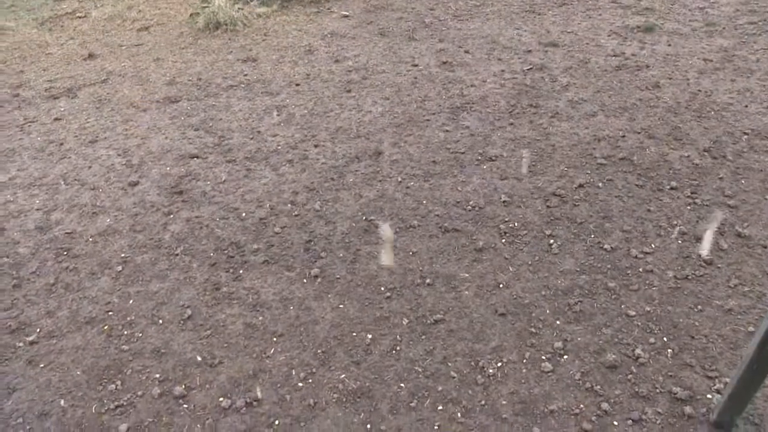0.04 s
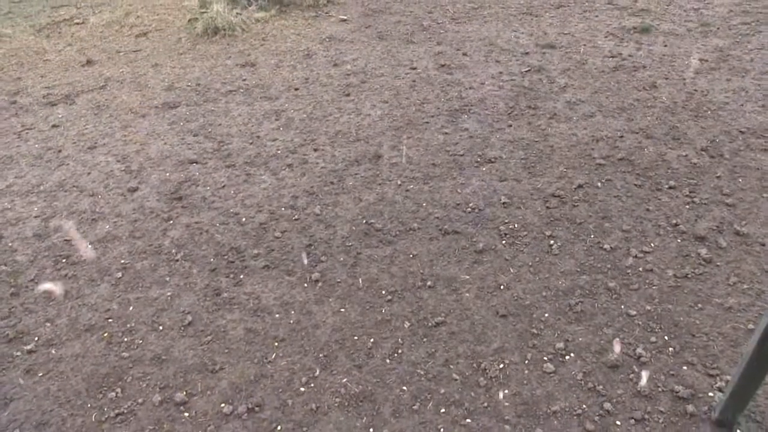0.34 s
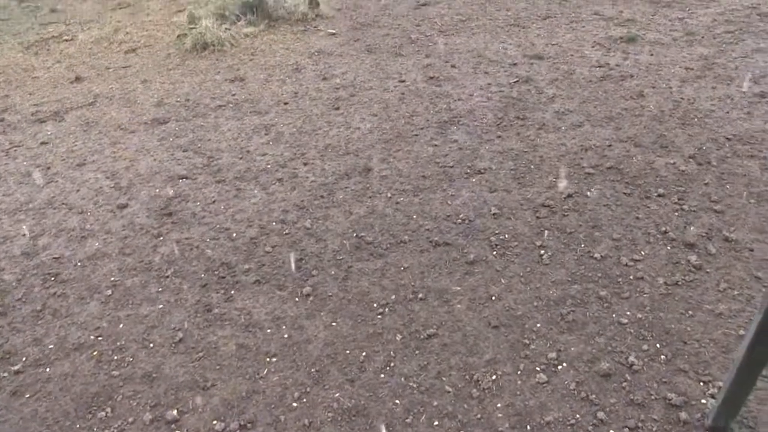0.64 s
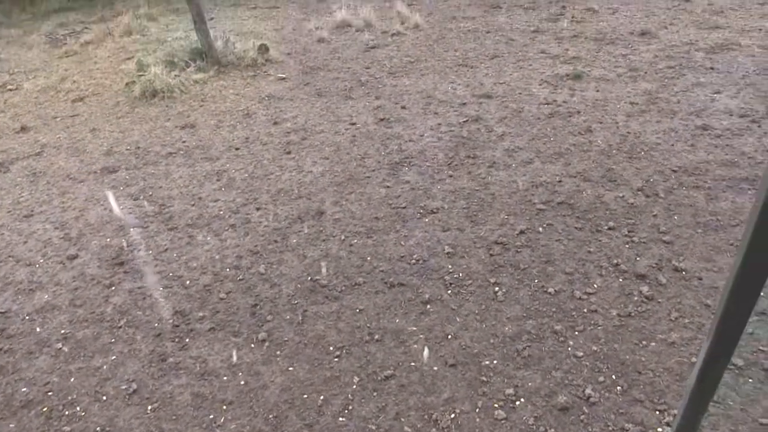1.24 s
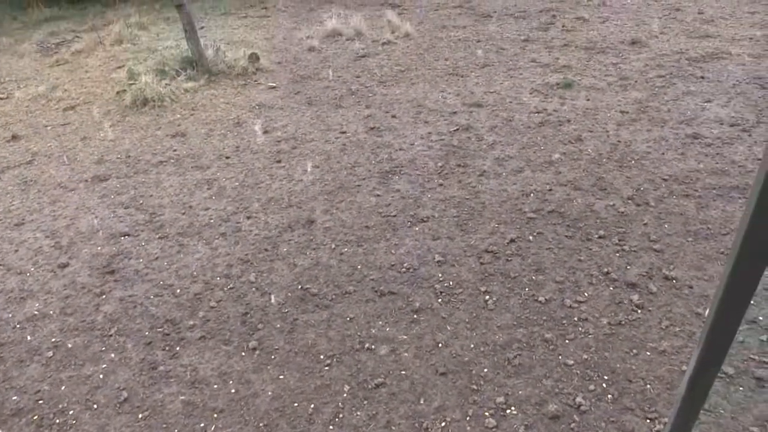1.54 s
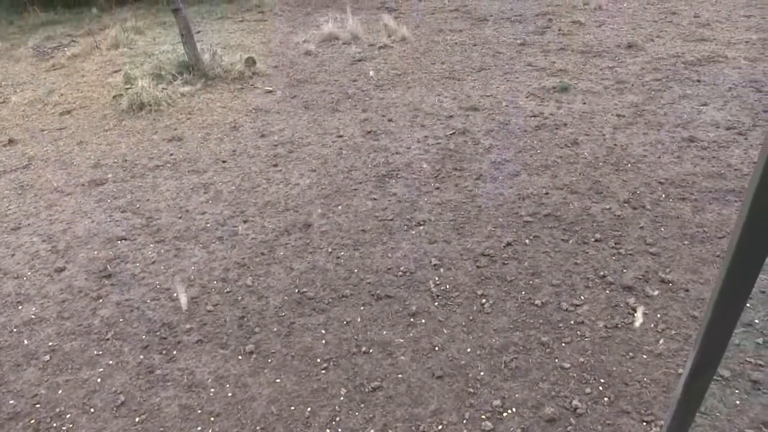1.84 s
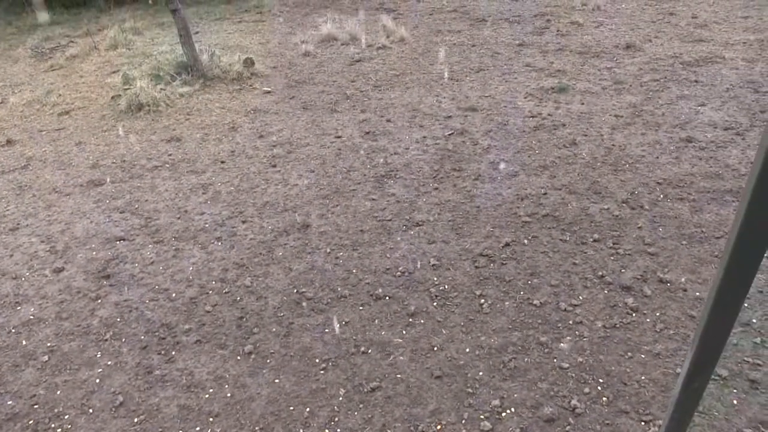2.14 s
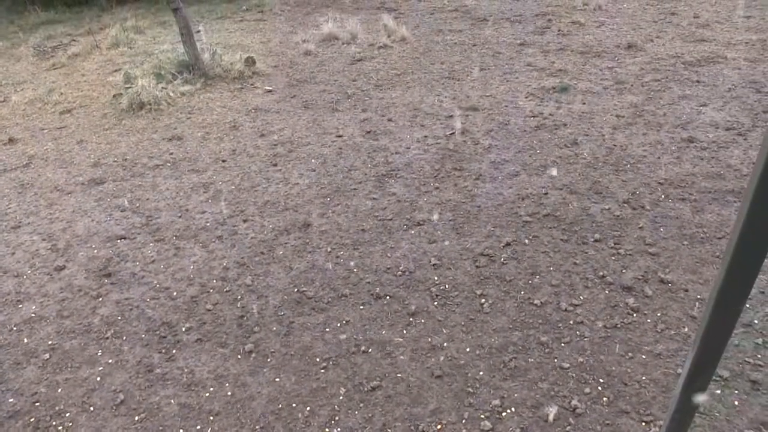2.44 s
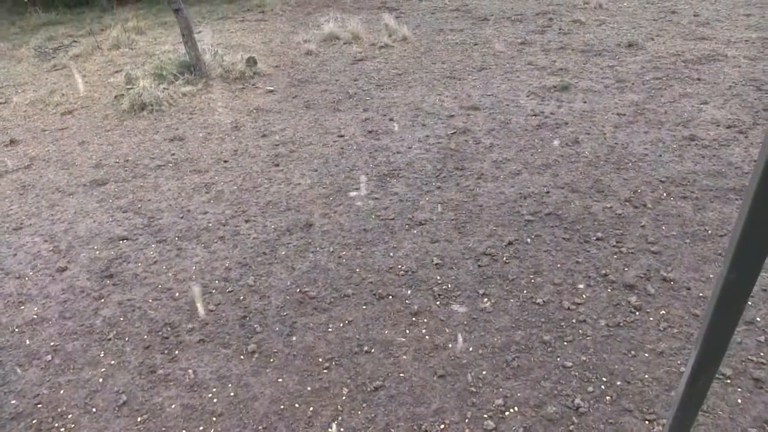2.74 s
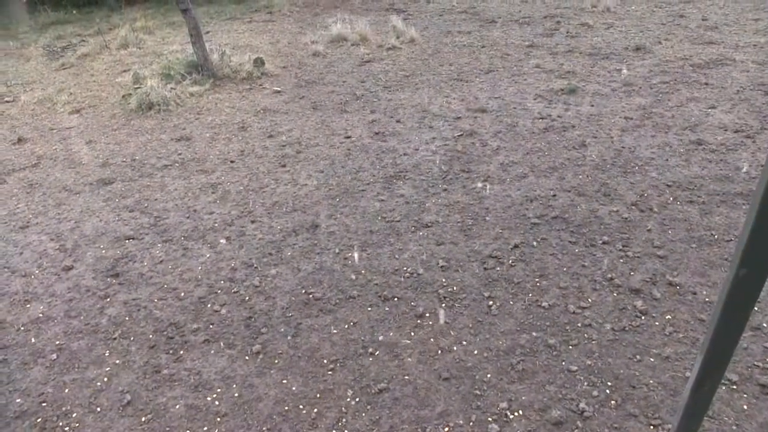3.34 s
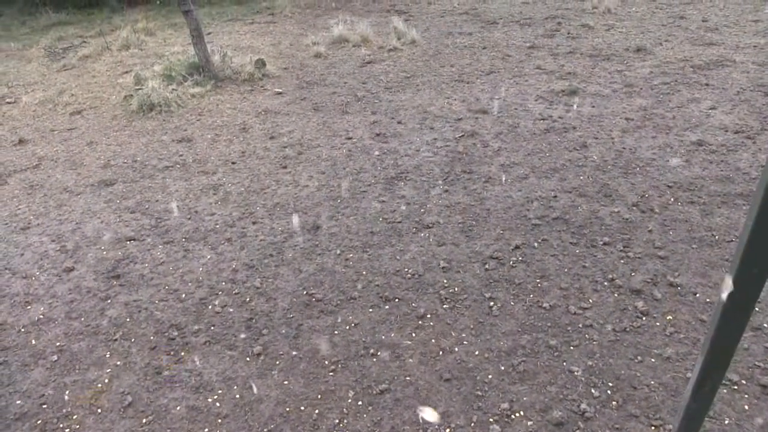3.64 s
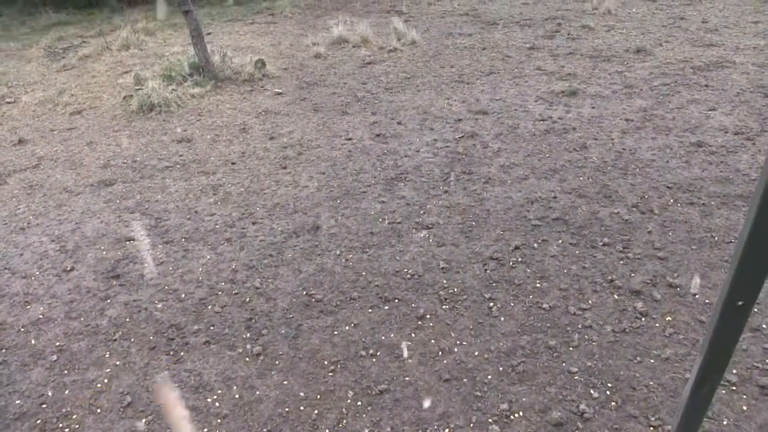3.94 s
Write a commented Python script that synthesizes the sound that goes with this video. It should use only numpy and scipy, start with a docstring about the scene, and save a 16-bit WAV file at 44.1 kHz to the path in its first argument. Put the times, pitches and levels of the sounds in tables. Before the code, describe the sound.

A bright metallic rattle of feed hitting a spinning feeder plate outdoors, gradually thinning.

```python
"""Spinning feeder outdoors

A stream of kernels rattles on an automatic feeder's metal spinner plate and housing, each impact
a short clack that sets the metal ringing. The flow thins about halfway. The same impacts make the
hollow hopper drone under the rattle. Thrown kernels patter on bare ground, a little air rumbles
at the microphone, and one dry knock sounds near the end."""
import sys
import numpy as np
from scipy import signal
from scipy.fft import rfft, irfft
from scipy.io import wavfile
from scipy.ndimage import uniform_filter1d

SR = 44100
rng = np.random.default_rng(int(sys.argv[2]) if len(sys.argv) > 2 else 0)


def put_to_file(sound):
    """Save the sound as 16-bit audio at rate SR, in the file named by the first command-line argument."""
    columns = np.atleast_2d(sound).T  # one column per channel
    safe = np.clip(columns, -1, 1)
    whole_steps = np.round(safe * 32767)
    wavfile.write(sys.argv[1], SR, whole_steps.astype(np.int16))


N = 4 * SR
TIME, HZ = np.arange(N) / SR, np.fft.rfftfreq(N, 1 / SR)


def amp(db):
    """Decibels to gain."""
    return 10 ** (np.asarray(db) / 20)


def unit_rms(x):
    """Scales to rms 1."""
    return x / np.sqrt(np.mean(x ** 2) + 1e-20)


def curve(rows):
    """A time table's value at every sample."""
    return np.interp(TIME, *np.transpose(rows))


def spectrum_curve(rows):
    """A spectrum table's value at every frequency."""
    hz, value = np.transpose(rows)
    return np.interp(np.log(HZ + 1), np.log(hz + 1), value)


def add(mix, start_s, sound):
    """Drops a sound into the mix."""
    part = mix[max(round(start_s * SR), 0):][:len(sound)]
    part += sound[:len(part)]


def colour(x, eq):
    """Minimum-phase EQ of unit energy: the table sets only the tone."""
    cepstrum = irfft(np.log(unit_rms(amp(spectrum_curve(eq)))), N)
    cepstrum[1:N // 2] *= 2
    cepstrum[N // 2 + 1:] = 0
    return irfft(rfft(x) * np.exp(rfft(cepstrum)), N)


def clicks(per_s, spread_db):
    """Random impacts of uneven size, rms 1."""
    size = amp(spread_db * np.minimum(rng.exponential(1, N), 3.5))
    return unit_rms(size * (rng.random(N) < per_s / SR))


def bursts(hits, t60_s, spots=8):
    """Each impact lands on one of several spots, each with its own dying noise burst; two versions."""
    t = TIME[:2048]
    spot = rng.integers(0, spots, N)
    dying_noise = rng.standard_normal((spots, 2, len(t))) * 1000 ** (-t / t60_s)
    spectra = rfft(dying_noise, 2 * len(t))
    average = np.sqrt(np.mean(abs(spectra) ** 2, axis=0))
    shapes = irfft(spectra / average)[..., :len(t)]  # together the spots sound white
    return sum(signal.oaconvolve((hits * (spot == k))[None], shapes[k], axes=1)[:, :N]
               for k in range(spots))


def ring(hits, modes):
    """Each impact pushes every mode by a chance amount, set by where it lands; two versions."""
    ringing, chance = np.zeros((2, N)), rng.standard_normal((2, N))
    for hz, db, t60_s in modes:
        radius = 1000 ** (-1 / (t60_s * SR))
        gain = amp(db) * np.sqrt((1 - radius ** 2) / 2)
        feedback = [1, -2 * radius * np.cos(2 * np.pi * hz / SR), radius ** 2]
        push = hits * np.roll(chance, rng.integers(N), 1)
        ringing += signal.lfilter([gain, 0, -gain], feedback, push)
    return ringing


# Fader ride of the rumble: time_s, relative_db
AIR_LEVEL = [(0.0, -74), (0.47, -71), (0.56, -88), (0.83, -62), (0.9, -78), (1.53, -58), (2.38, -67),
             (2.54, -98), (2.73, -71), (2.77, -90), (3.6, -83), (4.0, -60.5)]
# Dark tone of the air: freq_hz, relative_db
AIR_EQ = [(15, -10), (35, -12), (70, -5), (120, 1), (250, -1.5), (1000, -52)]


def air_rumble(trim_db=6):
    """Air at the microphone makes a faint, uneven low rumble."""
    return colour(rng.standard_normal((2, N)), AIR_EQ) * amp(trim_db + curve(AIR_LEVEL))


# Kernels landing close by: start_s, relative_db
CLOSE_LANDINGS = [(.159, -23), (.461, -27), (.817, -21), (1.195, -23), (1.241, -19), (1.279, -16),
                  (1.567, -22), (1.629, -22), (1.738, -22), (2.226, -28), (2.411, -24), (2.979, -21)]
# Dull tone of a landing on soil: freq_hz, relative_db
SOIL_EQ = [(50, -29), (150, -13), (450, 1), (1200, 3), (2000, -9), (5000, -7), (16000, -48)]


def ground_patter(flow_db, patter_trim_db=-31, close_trim_db=10):
    """Thrown kernels patter on dry soil, following the flow; a few land close by."""
    hits = clicks(per_s=90, spread_db=5.5) * amp(patter_trim_db + flow_db)
    for start_s, db in CLOSE_LANDINGS:
        add(hits, start_s, amp([db + close_trim_db]))
    return colour(bursts(hits, t60_s=0.055), SOIL_EQ)


# Midrange tone of the knock: freq_hz, relative_db
KNOCK_EQ = [(60, -35), (500, -17), (850, -10), (1250, 2.5), (1800, -2), (2200, -9), (3000, 0), (3800, -20),
            (6000, -40), (16000, -60)]


def knock(start_s=3.8071, peak_db=-9.5):
    """One dead tap, a cycle or two long."""
    tap = colour(np.arange(N) == round(start_s * SR), KNOCK_EQ)
    return amp(peak_db) * tap / abs(tap).max()


# Hollow resonances of the hopper: pitch_hz, gain_db, t60_s
HOPPER_MODES = [(214.5, -33.5, 0.19), (213, -47, 0.27), (391, -43, 0.2), (612.6, -36, 0.27),
                (991, -45, 0.049)]


def hopper_drone(hits):
    """The kernels' impacts keep the hopper's low modes sounding."""
    return ring(hits, HOPPER_MODES)


# Flow of feed over the spinner: time_s, level_db
FEED_FLOW = [(0.0, -15), (0.2, -16.5), (0.21, -12.5), (0.37, -17.5), (0.42, -13.5), (0.43, -17),
             (0.58, -14), (0.59, -16), (0.88, -16), (0.9, -11), (0.93, -19), (1.02, -12.5), (1.11, -15),
             (1.15, -18.5), (1.17, -14.5), (1.31, -12.5), (1.37, -18), (1.48, -14.5), (1.5, -16),
             (1.54, -12), (1.56, -19), (1.61, -14.5), (1.85, -16), (1.94, -21.5), (1.96, -24.5),
             (1.97, -20.5), (2.52, -21), (2.53, -18.5), (2.61, -23.5), (2.65, -19), (2.91, -22),
             (3.01, -19.5), (3.1, -24.5), (3.13, -20), (3.25, -21.5), (3.3, -17.5), (3.36, -23),
             (3.44, -22.5), (3.58, -23.5), (3.61, -22.5), (3.73, -25), (3.74, -21), (3.84, -26),
             (4.0, -24.5)]
# Hard strikes on the plate: start_s, relative_db
HARD_STRIKES = [(0.0925, 8), (0.2048, -20), (0.382, 0), (0.4702, -12), (0.569, 2.5), (0.634, -20),
                (0.8964, -2), (0.996, 2), (1.1607, 4.5), (1.2185, 0), (1.296, -13), (1.4111, 4.5),
                (1.468, -4), (1.533, 1), (1.6017, 4.5), (1.6515, -5), (1.7347, 5), (1.9719, -3),
                (2.0575, -2), (2.253, 2), (2.445, 0), (2.5239, -9), (2.986, -9), (3.1231, -1),
                (3.2713, -10), (3.4282, -2), (3.6095, -2), (3.6684, -2)]


def kernel_stream(clump_hz=70, clump_db=1.33, strike_trim_db=6.5, chatter_s=0.004):
    """Kernels reach the spinner in loose clumps; now and then one strikes hard and chatters."""
    slow_band = (HZ > 5) / (1 + (HZ / clump_hz) ** 2)
    clumps = unit_rms(irfft(rfft(rng.standard_normal(N)) * slow_band, N))
    kernels = clicks(per_s=3800, spread_db=2) * amp(clump_db * clumps)
    hits = unit_rms(kernels) * amp(curve(FEED_FLOW))
    for start_s, db in HARD_STRIKES:
        delays_s = chatter_s * np.sort(rng.random(size=4))
        delays_s[0] = 0  # the first contact is on time
        for delay_s in delays_s:
            add(hits, start_s + delay_s, amp([db + strike_trim_db]) / 2)
    return hits


# Depth of the notches between the metal's peaks: time_s, depth_fraction
NOTCH_DEPTH = [(0, 0.4), (3.4, 0.67), (3.8, .65), (4, .7)]


def hollow_out(metal, notches_hz=(6090, 7540, 8420, 9810, 12000), width_hz=190):
    """As the feed runs thin, the ring hollows out between its peaks."""
    notches = sum(np.exp(-((HZ - hz) / width_hz) ** 2) for hz in notches_hz)
    return metal - curve(NOTCH_DEPTH) * irfft(rfft(metal) * notches, N)


# Tilt of the treble over the mids: time_s, tilt_db
TREBLE_TILT = [(0, -0.5), (.37, 3), (.45, 1.5), (.58, 1.5), (.64, -1), (.72, -3), (1.08, 1), (1.14, -0.5),
               (1.2, 0), (1.32, -2), (1.39, -1.5), (1.46, 4), (1.55, -1), (1.7, -1.5), (1.85, 0),
               (2.6, -.5), (3.3, 0.5), (3.65, 0.5), (4, -1)]
# Ride on one narrow band of the ring: time_s, gain_db
BAND_SWELL = [(0, -0.5), (.8, -7), (1.05, 2.5), (1.3, 1.5), (1.5, 0), (1.75, 0.5), (2.2, -0.5), (2.7, 0),
              (3.05, -0.5), (3.5, 1.5), (3.65, 2), (4, -1.5)]


def drift_tone(metal, crossover_hz=6000, swell_hz=4780, width_hz=260):
    """The treble drifts against the mids while one narrow band dips and swells."""
    spectrum = rfft(metal)
    mids = irfft(spectrum / (1 + (HZ / crossover_hz) ** 10), N)
    treble = metal - mids
    band = irfft(spectrum * np.exp(-((HZ - swell_hz) / width_hz) ** 2), N)
    swell = band * (amp(curve(BAND_SWELL)) - 1)
    tilt = amp(curve(TREBLE_TILT) / 2)
    return (mids + swell) / tilt + treble * tilt


def wander(metal, depth_db=1.5, patch_bins=14, patch_frames=5):
    """The spot where the stream lands wanders, so each part of the spectrum waxes and wanes."""
    frames = signal.stft(metal, nperseg=512)[2]
    patches = rng.standard_normal(frames.shape[1:])
    for _ in range(2):
        patches = uniform_filter1d(patches, patch_bins, axis=0)
        patches = uniform_filter1d(patches, patch_frames, axis=1)
    gain = unit_rms(amp(depth_db * unit_rms(patches)))
    return signal.istft(frames * gain, nperseg=512)[1][:, :N]


# Bright tone of a kernel's clack: freq_hz, relative_db
CLACK_EQ = [(40, -69), (100, -39), (170, -45.5), (300, -27), (600, -26), (900, -22.5), (1190, -14.5),
            (1500, -21), (1900, -18.5), (2150, -10.5), (2400, -8), (2630, -2.5), (2900, -12), (3080, -20),
            (3300, -4.5), (3520, 2), (3800, -12), (4450, -10), (4850, -3.5), (5200, -13.5), (5950, -12),
            (6300, -9.5), (6650, -5), (7000, -8.5), (7300, -12.5), (7650, -11.5), (7950, -5), (8450, -5),
            (9000, -3), (9650, -13), (10050, -1.5), (10400, 0), (10900, -14), (11900, -16), (12700, -14),
            (15700, -14.5)]
# Ringing modes of plate and housing: pitch_hz, relative_db, t60_s
METAL_MODES = [(1097, -29.5, .28), (1256, -26, .24), (2050, -31, .12), (2480, -27, .08), (2815, -28, .1),
               (3134, -25.5, .25), (3394, -16.5, .12), (3554, -11.5, .07), (4672, -17, .18),
               (4903, -15.5, .11), (5545, -27, .06), (6126, -25, .15), (6433, -17.5, .13),
               (6510, -22.5, .1), (6966, -22, .07), (7936, -17, .07), (8180, -25, .08), (8500, -25, .08),
               (8947, -18, .09), (9055, -19, .08), (9424, -20.5, .12), (9588, -23.5, .12), (9902, -21, .11),
               (10059, -19, .1), (10360, -20, .06), (13620, -31, .06), (14570, -28, .06)]


def spinner_rattle(hits, clack_db=-1.37, ring_db=1.5):
    """Each kernel clacks on the metal and sets the plate and housing ringing."""
    clacks = amp(clack_db) * colour(bursts(hits, t60_s=0.012), CLACK_EQ)
    ringing = amp(ring_db) * ring(hits, METAL_MODES)
    return wander(drift_tone(hollow_out(clacks + ringing)))


# Stereo width across the spectrum: freq_hz, side_gain_db
STEREO_WIDTH = [(50, -4), (120, -7), (220, -17), (400, -21.5), (680, -8), (950, -17), (1200, -48),
                (1550, -41), (2050, -26), (2700, -15.5), (3000, -20), (3150, -10), (3400, -14),
                (3900, -13.5), (4800, -36), (5700, -31), (6600, -40.5), (7700, -29), (8170, -10.5),
                (8450, 0), (9100, -25), (9400, -13), (9590, 0), (9850, -20.5), (11500, -18), (13600, -10.5),
                (14200, -18), (14550, -8), (15200, -15)]
# Part of the side signal that leans the image right: time_s, lean_fraction
RIGHT_LEAN = [(0, .5), (.8, .5), (1.2, 0.4), (3, 0.32), (4, 0.26)]


def close_pair(mid, decorrelated, right_lead=0.25):
    """Two close microphones hear almost the same sound, the right a little louder and earlier."""
    lean = curve(RIGHT_LEAN)
    diffuse = np.sqrt(np.maximum(1 - lean ** 2 - right_lead ** 2, 0))
    side_spectrum = rfft(diffuse * decorrelated - lean * mid) - 1j * right_lead * rfft(mid)
    side = irfft(amp(spectrum_curve(STEREO_WIDTH)) * side_spectrum, N)
    return np.array([mid + side, mid - side])


def scene(low_cut_hz=130):
    """Rattle, drone and patter, without deep bass, over the air; the knock sits dead centre."""
    hits = kernel_stream()
    feeder = spinner_rattle(hits) + hopper_drone(hits) + ground_patter(curve(FEED_FLOW))
    low_cut = signal.butter(4, low_cut_hz, "high", fs=SR, output="sos")
    mid, decorrelated = signal.sosfilt(low_cut, feeder) + air_rumble()
    return close_pair(mid, decorrelated) + knock()


def record(dry, ceiling=0.88, high_cut_hz=15780):
    """A soft clip rounds off the highest peaks, then a steep high cut trims the top."""
    rounded = dry / (1 + (dry / ceiling) ** 8) ** (1 / 8)
    high_cut = signal.firwin(1023, high_cut_hz, window=("kaiser", 9), fs=SR)
    return signal.oaconvolve(rounded, high_cut[None], "same")


dry = scene()
out = record(dry)
put_to_file(out)
```